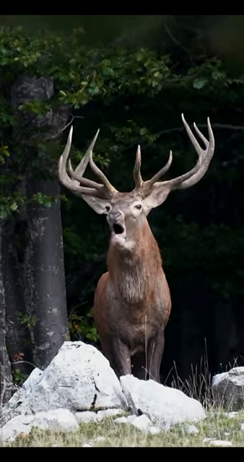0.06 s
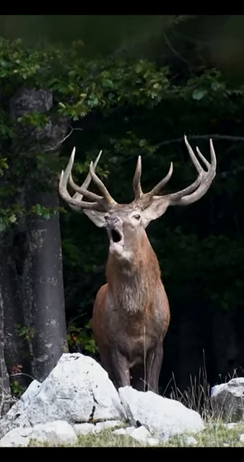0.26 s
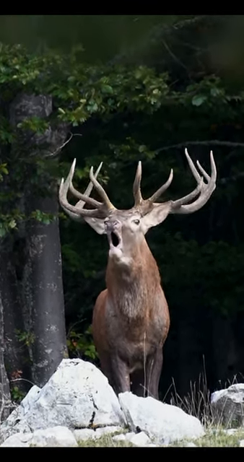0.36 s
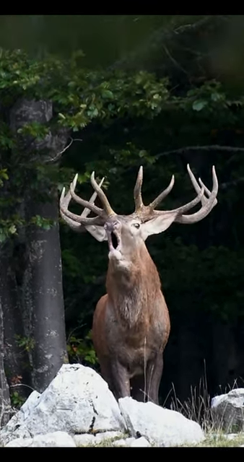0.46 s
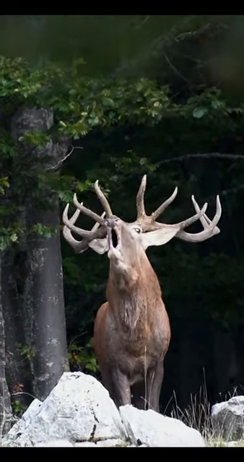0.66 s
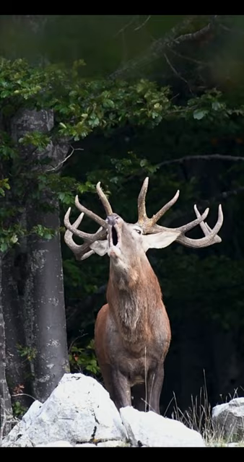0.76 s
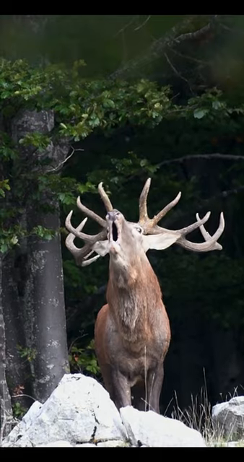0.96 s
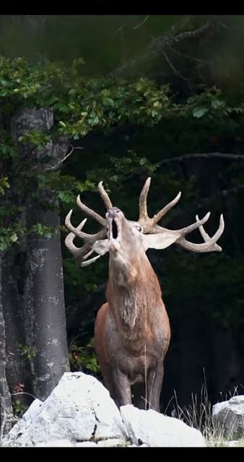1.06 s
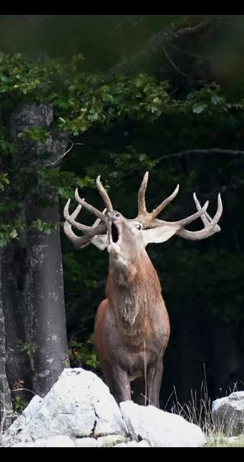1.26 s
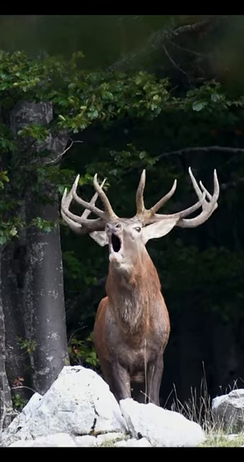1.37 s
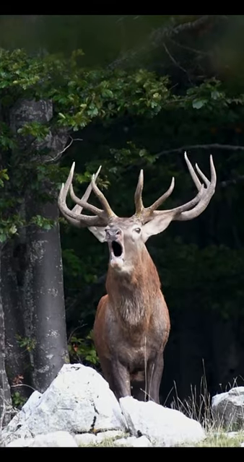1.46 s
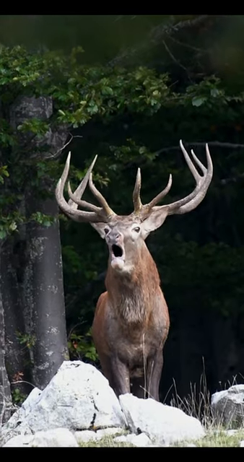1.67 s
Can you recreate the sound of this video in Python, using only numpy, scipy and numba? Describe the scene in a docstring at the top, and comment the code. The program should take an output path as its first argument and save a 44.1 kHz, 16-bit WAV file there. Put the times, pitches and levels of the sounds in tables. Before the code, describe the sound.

A stag roars once, starting with a clean pitched tone that deepens, turns harsh and chesty, then sags into two throaty claps. The roar comes from slightly right, echoing off the forest over a faint outdoor hiss.

```python
"""A red deer stag roaring

One roar at the edge of a forest, a little to the right. Source and filter: the vocal folds beat in
clean pulses while the larynx is drawn down the neck, so the tube lengthens and its resonances sink.
At full stretch the voice turns harsh and chesty, then sags and ends in two hard claps.
The trees ring on over a faint hiss."""
import sys
import numpy as np
from scipy import signal
from scipy.fft import rfft, irfft, next_fast_len
from scipy.io import wavfile
from scipy.ndimage import uniform_filter1d
from numba import njit

SR = 44100
rng = np.random.default_rng(int(sys.argv[2]) if len(sys.argv) > 2 else 0)


def to_wav(sig):
    """Store sig (one row per channel, or 1-D mono) as 16-bit WAV at the path in sys.argv[1].

    Samples outside -1..1 are clipped; the rate is SR.
    """
    pcm = np.clip(np.atleast_2d(sig), -1, 1) * 32767
    pcm = np.round(pcm).astype(np.int16)
    wavfile.write(sys.argv[1], SR, pcm.T)  # frames by channels


N = 74970
T = np.arange(N) / SR


def from_db(db):
    """Amplitude ratio of a level in decibels."""
    return 10 ** (np.asarray(db) / 20)


def in_time(rows):
    """Linear interpolation of a curve at every sample."""
    return np.interp(T, *np.transpose(rows))


def at_hz(points, hz):
    """Interpolation of a spectrum on a log-frequency axis."""
    f, value = np.transpose(points)
    return np.interp(np.log(hz + 1), np.log(f), value)


def colour(x, gain):
    """Linear filtering: the spectrum is multiplied by gain(f)."""
    size = next_fast_len(2 * N)
    hz = np.arange(size // 2 + 1) * SR / size
    return irfft(rfft(x, size) * gain(hz), size)[..., :N]


def band(x, low_hz, high_hz):
    """Band-pass filtering keeps one register."""
    return signal.sosfilt(signal.butter(3, [low_hz, high_hz], "band", fs=SR, output="sos"), x)


def pan(db):
    """Interaural level difference as left and right gains with mean 1."""
    ratio = from_db(np.atleast_1d(db))
    return np.array([ratio, np.ones_like(ratio)]) * 2 / (1 + ratio)


def drift(hz):
    """Random fluctuation: low-passed noise of unit variance."""
    slow = colour(rng.standard_normal(N), lambda f: 1 / (1 + (f / hz) ** 2))
    return slow / slow.std()


def running_rms(x, size=900):
    """Effective amplitude over a few cycles."""
    power = uniform_filter1d(uniform_filter1d(x * x, size), size)
    return np.sqrt(np.abs(power) + 1e-14)


def clicks(times, heights):
    """Band-limited impulses: sinc interpolation places them between samples."""
    out, at = np.zeros(N), np.clip(times * SR, 10, N - 10)
    for k in range(-3, 5):
        i = at.astype(int) + k
        np.add.at(out, i, heights * np.sinc(i - at))
    return out


# Interaural coherence of diffuse sound: f/Hz, coherence
COHERENCE = [(400,1.0),(700,.93),(1500,.7),(3000,.3),(6000,.05)]

def diffuse_noise():
    """A diffuse field is alike at both ears in the bass and unrelated in the treble."""
    mid, side = rng.standard_normal((2, N))
    mid = colour(mid, lambda f: np.sqrt((1 + at_hz(COHERENCE, f)) / 2))
    side = colour(side, lambda f: np.sqrt((1 - at_hz(COHERENCE, f)) / 2))
    return mid + side * [[1], [-1]]


# Spectral density of the background: f/Hz, relative level/dB
AIR_SPECTRUM = [(25,-21),(60,-16),(130,-6),(290,-2),(600,-3),(1000,-7.5),(2000,-8.5),(3200,-13),(5500,-11.5),(9000,-15.5),(15000,-23.5)]

def air(level_db=-46.5, treble_pan_db=-1.5):
    """Stationary diffuse noise: the hiss of the open hillside."""
    balance = lambda f: pan(treble_pan_db * (1 - at_hz(COHERENCE, f)))
    noise = colour(diffuse_noise(), lambda f: from_db(at_hz(AIR_SPECTRUM, f)) * balance(f))
    return from_db(level_db) * noise / noise.std()


# Left ear minus right ear: f/Hz, level/dB
EAR_LEVEL = [(500,0),(750,-.3),(1000,-4),(1500,-5),(1900,-11),(2380,-18),(2850,-12.5),(3300,-4.7),(4000,-7),(5400,-7),(6100,-14),(7200,-4),(10000,-2)]
# Phase lead of the left ear: f/Hz, phase/rad
EAR_PHASE = [(550,0),(870,-.5),(1100,-.4),(1800,-1.35),(2280,-1.3),(2650,-.1),(3050,.45),(3500,0),(4200,.3),(4800,2.8),(7000,1.5)]

def from_the_right(hz, share=1):
    """Interaural differences of level and phase place a sound on the stag's side."""
    phase = share * at_hz(EAR_PHASE, hz)
    return pan(share * at_hz(EAR_LEVEL, hz)) * np.exp(.5j * phase * [[1], [-1]])


# Spectral weighting of the forest's echo: f/Hz, relative level/dB
ECHO_SPECTRUM = [(140,-14),(330,-2),(460,-2),(620,-9),(850,-6),(1200,-8),(1550,-11),(2200,-15),(4000,-15),(9000,-15)]

def forest(voice, bass_t60_s=1.54, treble_t60_s=1, leaf_hz=1090, build_s=0.011, gain_db=-1):
    """Reverberation by scattering from trunks; absorption by leaves shortens the treble's decay."""
    noise = diffuse_noise()
    bass = colour(noise, lambda f: 1 / (1 + (f / leaf_hz) ** 2))
    echoes = bass * from_db(-60 * T / bass_t60_s) + (noise - bass) * from_db(-60 * T / treble_t60_s)
    echoes *= 1 - np.exp(-(T / build_s) ** 2)
    echoes /= np.sqrt(np.sum(echoes ** 2) / 2)
    sent = colour(voice, lambda f: from_db(gain_db + at_hz(ECHO_SPECTRUM, f)) * from_the_right(f, 0.85))
    return signal.fftconvolve(sent, echoes, axes=1)[:, :N]


def rocks(voice, delay_s=.0032, gain_db=-12):
    """Early reflection: the rocks at his feet return the upper band after a short delay."""
    return from_db(gain_db) * np.interp(T - delay_s, T, band(voice, 940, 8200))


# Closing impacts of the folds: t/s, relative level/dB
IMPACTS = [(1.3883,8),(1.3903,-5),(1.3999,2),(1.407,4),(1.4102,6.5),(1.4171,-14)]

def claps(decay_s=0.0077, turbulence=0.083):
    """Impulsive excitation: the slack folds slap together, each time with a burst of turbulence."""
    burst = np.exp(-T / decay_s) * turbulence * rng.standard_normal(N)
    burst[0] = 1  # the impact itself
    times, db = np.transpose(IMPACTS)
    return signal.fftconvolve(clicks(times, from_db(db)), burst)[:N]


# First, second and third harmonics of the chest tone, each: t/s, level/dB
FUNDAMENTAL = [(0.2,-91),(0.49,-63.5),(0.53,-56.5),(0.68,-43),(0.9,-39.5),(1.15,-43.5),(1.3,-48.5),(1.44,-50)]
SECOND_HARMONIC = [(0.2,-62),(0.5,-66),(0.59,-57),(0.69,-37),(0.8,-32),(0.88,-30),(1.1,-30.5),(1.2,-38),(1.28,-41),(1.34,-47),(1.39,-43),(1.44,-42)]
THIRD_HARMONIC = [(0.2,-66),(0.53,-63),(0.6,-44),(0.69,-44),(0.77,-48),(0.88,-33.5),(1.0,-32),(1.1,-33),(1.24,-42),(1.3,-42),(1.361,-35),(1.43,-43)]

def chest_tone(cycles):
    """A harmonic series: three smooth partials of alternating sign, phase-locked to the folds."""
    tone = np.zeros(N)
    for k, level in enumerate((FUNDAMENTAL, SECOND_HARMONIC, THIRD_HARMONIC), 1):
        tone -= (-1) ** k * np.sqrt(2) * np.cos(2 * np.pi * k * cycles) * from_db(in_time(level))
    return tone


@njit
def resonate(x, angle, r):
    """A damped oscillator with moving pole angle and radius r, and a peak gain near 1."""
    out, state = np.zeros(len(x)), 0j
    for i in range(len(x)):
        state = state * r[i] * np.exp(1j * angle[i]) + x[i]
        out[i] = 2 * (1 - r[i]) * state.real
    return out


# Throat resonances, one a row: f/Hz with the larynx high, f/Hz halfway, f/Hz low
FORMANT_HZ = [(940,688,367.6),(1485,1168,855.5),(1793,1493,1239),(2230,1900,1510),(2433,2140,1750),(2870,2300,2278),(3450,2880,2930),(3730,3240,3140),(3900,3580,3300),(5160,2900,4900),(5980,6000,4940),(6340,6900,6200),(9800,8800,8230)]
# The same resonances: base width/Hz, level/dB with the larynx high, level/dB halfway, level/dB low
FORMANT_SHAPE = [(36.4,2.5,-1,-0.5),(28,-1.5,1,-3),(38.8,1.5,6,1),(35.5,3.5,7.5,5.5),(51.6,5.5,8.5,2),(59.4,2.5,2,4.5),
                 (101,2,3,-4),(89,3,9,6.5),(104,3,4.5,-21),(300,-15,-6,-8),(293,20,9,5.5),(493,-14,-6,-1.5),(350,-1,7,-1)]
# Damping of the throat: t/s, factor on the widths
WIDTH_FACTOR = [(0.15,2),(0.3,1.35),(0.45,.95),(0.8,1.05),(0.95,1.4),(1.17,1.3),(1.28,1.8),(1.36,1.4),(1.42,1.4)]
LOWEST, MIDDLE, UPPER, HIGHEST = slice(0, 1), slice(1, 6), slice(6, 9), slice(9, 13)

def throat(source, formants, retraction):
    """Tube resonance: parallel formants sink as the vocal tract lengthens."""
    def glide(high, half, low):
        return half + (2 * retraction - 1) * np.where(retraction < .5, half - high, low - half)

    out, damping = np.zeros(N), in_time(WIDTH_FACTOR)
    for hz, (width, *db) in zip(FORMANT_HZ[formants], FORMANT_SHAPE[formants]):
        angle = 2 * np.pi * glide(*hz) / SR
        radius = np.exp(-np.pi * width * damping / SR)
        out += resonate(source * from_db(glide(*db)), angle, radius)
    return out


# Pulse rate of the folds as the roar builds, then as it is held and let go: t/s, f/Hz
RISING_PITCH = [(0.16, 87.3), (0.2, 108.6), (0.226, 116.1), (0.25, 122), (0.286, 126.2), (0.334, 129.8),
                (0.45, 133), (0.54, 134.6), (0.658, 141), (0.715, 145), (0.766, 141.9), (0.8, 143.5)]
FALLING_PITCH = [(0.86, 145), (0.98, 145.2), (1.1, 144.4), (1.155, 142), (1.194, 135.8), (1.222, 133.4),
                 (1.27, 130.5), (1.3, 127.5), (1.36, 116.7), (1.398, 105), (1.44, 88)]

def fold_cycles(roughness, waver=0.0132, lag_cycles=0.0969):
    """Phase, in cycles, is the integral of frequency; the pitch wavers with roughness."""
    hz = in_time(list(RISING_PITCH) + list(FALLING_PITCH)) * (1 + waver * roughness * drift(hz=32.5))
    return np.cumsum(hz) / SR - lag_cycles


JITTER_S, SHIMMER_DB, THROB_DB = 0.00032, 2.5, 1.5  # at roughness 1

def folds(cycles, roughness, retraction, smear_s_per_hz=1e-6):
    """Glottal source: each closure gives a pulse, with jitter and shimmer, and a puff of turbulence."""
    times = np.interp(np.arange(1, int(cycles[-1])), cycles, T)
    harsh, count = np.interp(times, T, roughness), len(times)
    jitter, shimmer = rng.standard_normal((2, 400))[:, :count]
    throb = THROB_DB * np.cos(2 * np.pi * np.arange(count) / 3)  # every third pulse is stronger
    pulses = clicks(times + JITTER_S * harsh * jitter, from_db(harsh * (SHIMMER_DB * shimmer + throb)))
    # Closures soften as the throat stretches: their treble lags.
    softness = np.interp(retraction, (0.43, 0.566), (0, 1))
    smeared = colour(pulses, lambda f: np.exp(-1j * np.pi * smear_s_per_hz * f ** 2))
    pulses = np.sqrt(1 - softness) * pulses + np.sqrt(softness) * smeared
    decay_cycles = .45 + 1.2 * softness * retraction
    puffs = rng.standard_normal(N) * np.exp(-(cycles % 1) / decay_cycles)
    flutter_db = roughness * SHIMMER_DB * drift(hz=60) + np.interp(T, times, harsh * throb)
    puffs = puffs / running_rms(puffs) * from_db(flutter_db)
    return pulses / pulses.std(), puffs / puffs.std()


# Descent of the larynx: t/s, share of full stretch
LARYNX_DESCENT = [(0.14,-0.12),(0.2,0),(0.33,0.19),(0.45,0.33),(0.56,0.5),(0.62,0.58),(0.68,0.68),(0.74,0.77),(0.8,0.87),(0.9,0.93),(1.0,0.98),(1.42,1)]
# Harshness of the voice: t/s, roughness from 0 to 1
ROUGHNESS = [(0.15,.1),(0.3,.05),(0.54,.03),(0.62,.05),(0.72,.12),(0.79,.25),(0.84,.45),(0.92,.8),(1.16,.75),(1.2,.12),(1.26,.06),(1.36,.09),(1.41,.4)]
# Drive to the lowest formant: t/s, level/dB
BASS_DRIVE = [(0.15, -28), (0.3, -20), (0.44, -17), (0.58, -7), (0.63, -15.5), (0.68, -9.5), (0.71, -20),
              (0.8, -17), (0.88, -10.5), (1.12, -13), (1.25, -36), (1.36, -11), (1.44, -13.5)]
# Envelopes of the middle, upper and highest registers, each: t/s, level/dB
MIDDLE_LEVEL = [(0.131, -51.5), (0.212, -33.5), (0.256, -27), (0.44, -25.5), (0.572, -20.5), (0.664, -23),
                (0.702, -34), (0.744, -24), (0.81, -18.5), (0.858, -24.5), (0.964, -21.5), (1.06, -21.5),
                (1.17, -23.5), (1.19, -27.5), (1.33, -32), (1.38, -31.5), (1.41, -32), (1.44, -40.5)]
UPPER_LEVEL = [(0.15, -69), (0.18, -46.5), (0.2, -41), (0.268, -34), (0.482, -35), (0.574, -24),
               (0.647, -27.5), (0.682, -41.5), (0.798, -33.5), (0.832, -34), (1.0, -31), (1.094, -29.5),
               (1.12, -32.5), (1.27, -35), (1.352, -39.5), (1.372, -40), (1.41, -41), (1.44, -46)]
HIGHEST_LEVEL = [(0.17, -64), (0.242, -49), (0.47, -48), (0.65, -56), (0.756, -38), (0.928, -48),
                 (0.942, -45), (1.362, -45), (1.37, -49)]
RASP, UPPER_RASP, WHEEZE = 1.2, 2.4, 11  # turbulence: in all registers, extra in the upper, the highest
START_S, ATTACK_S, RELEASE_S, END_S = 0.139, 0.013, 0.004, 1.455

def stag():
    """Source-filter principle: pulses, rasp and claps excite the throat, over the chest tone."""
    roughness, retraction = in_time(ROUGHNESS), in_time(LARYNX_DESCENT)
    cycles = fold_cycles(roughness)
    pulses, puffs = folds(cycles, roughness, retraction)
    rasp = roughness * puffs
    source = pulses + RASP * rasp
    slaps = claps()

    def register(drive, formants, level, band_hz, clap_db):
        voiced = band(throat(drive, formants, retraction), *band_hz)
        slapped = band(throat(slaps, formants, retraction), *band_hz)
        return voiced / running_rms(voiced) * from_db(in_time(level)) + from_db(clap_db) * slapped

    voice = band(throat(source * from_db(in_time(BASS_DRIVE)), LOWEST, retraction), 143, 1060)
    voice += register(source, MIDDLE, MIDDLE_LEVEL, band_hz=(778, 2410), clap_db=5.5)
    voice += register(source + UPPER_RASP * rasp, UPPER, UPPER_LEVEL, band_hz=(2410, 3880), clap_db=-3)
    voice += register(source + WHEEZE * puffs, HIGHEST, HIGHEST_LEVEL, band_hz=(4200, 8800), clap_db=-21)
    voice += chest_tone(cycles)
    return voice * np.clip((T - START_S) / ATTACK_S, 0, 1) * np.clip((END_S - T) / RELEASE_S, 0, 1)


def scene():
    """Superposition of direct sound, early reflection, reverberation and background."""
    voice = stag()
    return colour(voice + rocks(voice), from_the_right) + forest(voice) + air()


# Dips in the microphone's response: f/Hz, width/Hz
MICROPHONE_DIPS = [(2605,558),(7750,1900)]

def record(dry):
    """Frequency response of the microphone: two notches and a steep low-pass."""
    for hz, width in MICROPHONE_DIPS:
        dry = signal.lfilter(*signal.iirnotch(hz, hz / width, fs=SR), dry)
    return signal.sosfilt(signal.ellip(10, .1, 80, 15600, fs=SR, output="sos"), dry)


dry = scene()
out = record(dry)
to_wav(out)
```